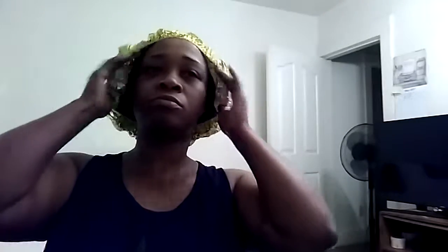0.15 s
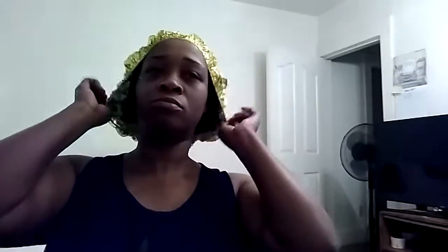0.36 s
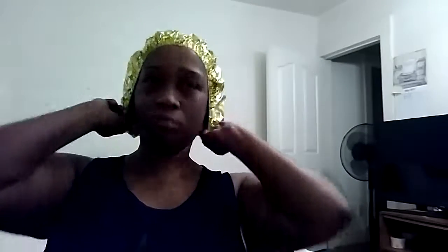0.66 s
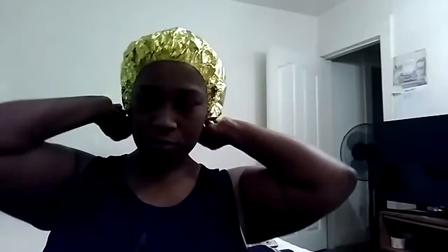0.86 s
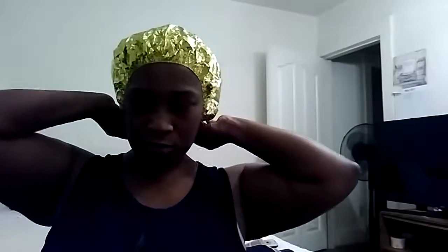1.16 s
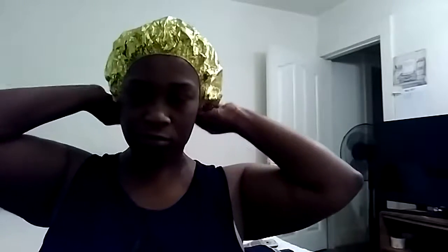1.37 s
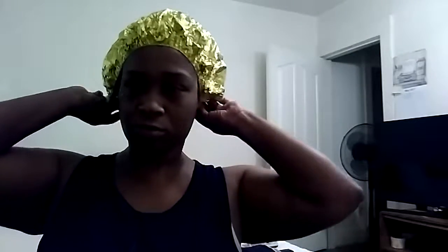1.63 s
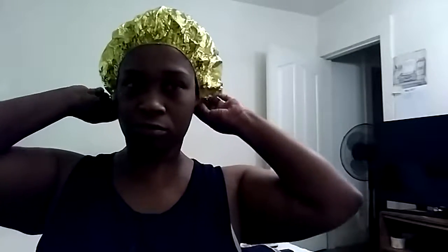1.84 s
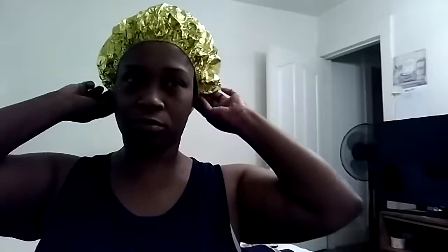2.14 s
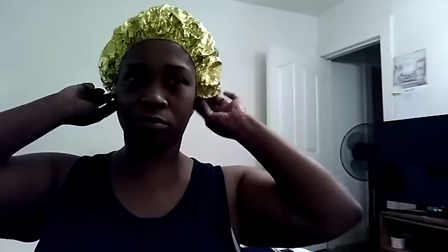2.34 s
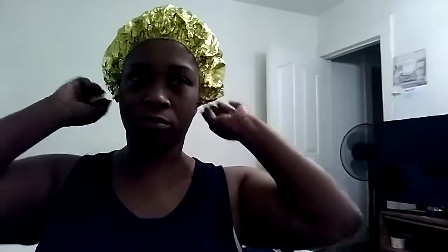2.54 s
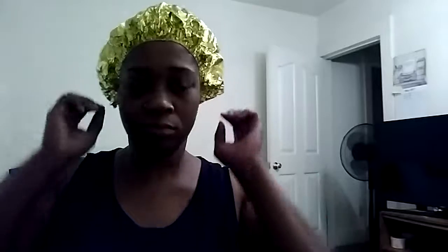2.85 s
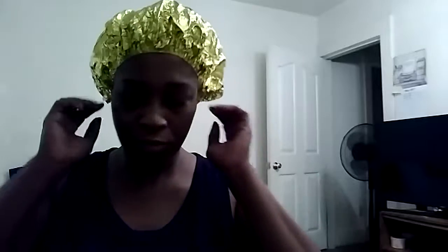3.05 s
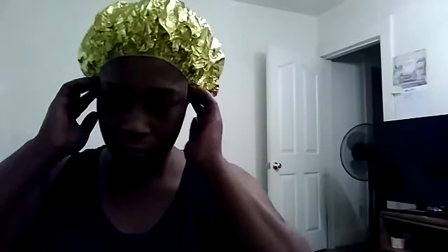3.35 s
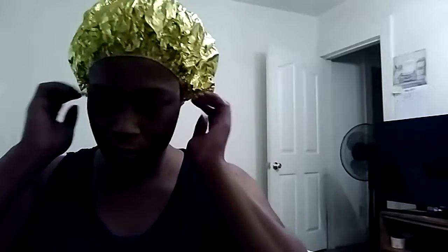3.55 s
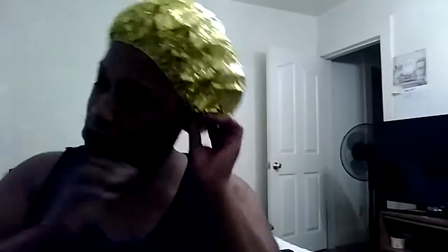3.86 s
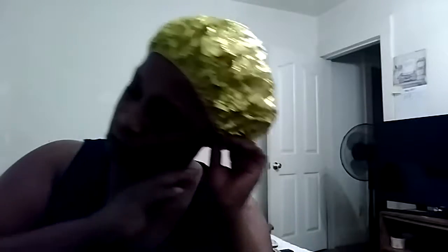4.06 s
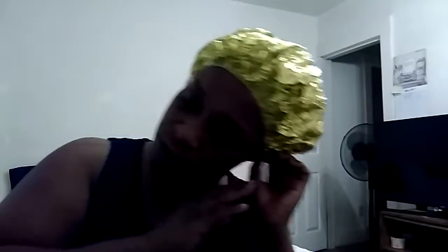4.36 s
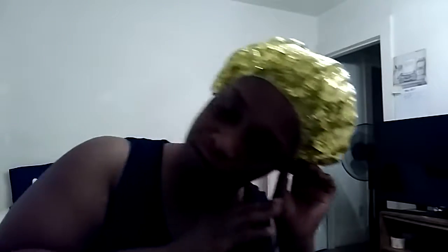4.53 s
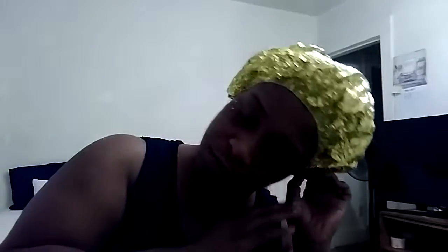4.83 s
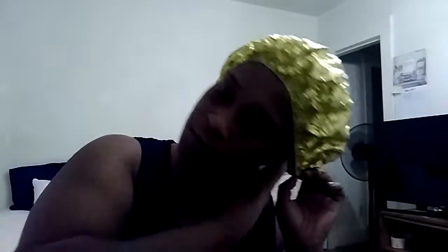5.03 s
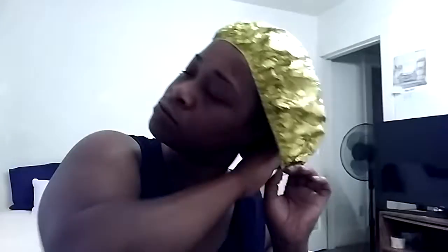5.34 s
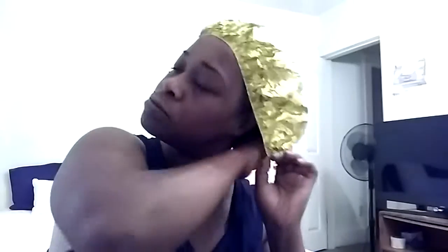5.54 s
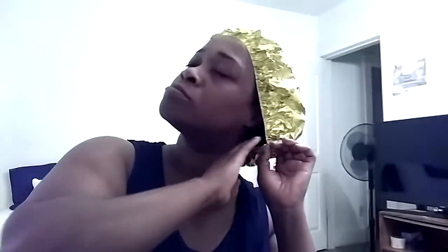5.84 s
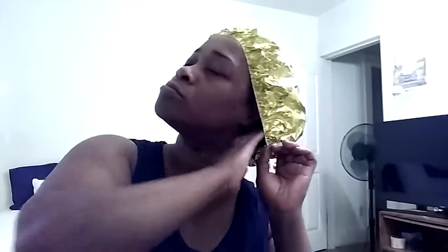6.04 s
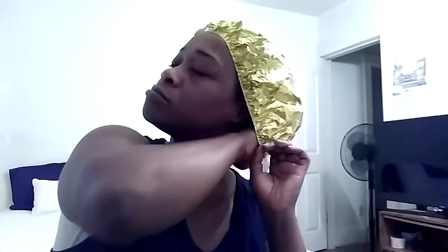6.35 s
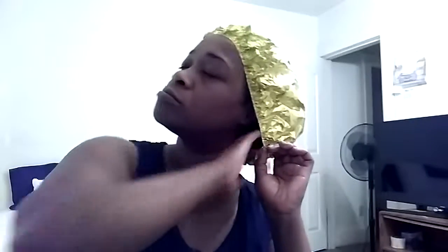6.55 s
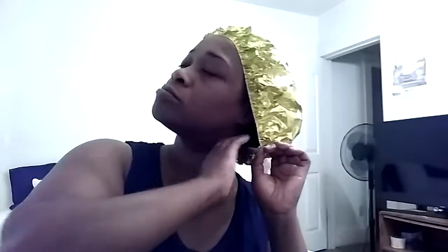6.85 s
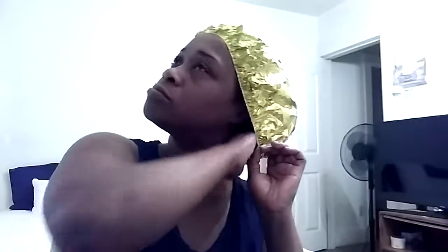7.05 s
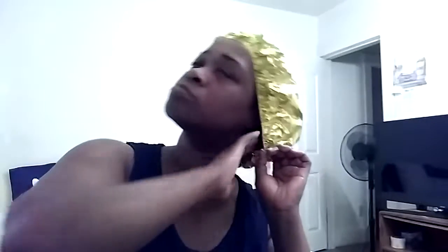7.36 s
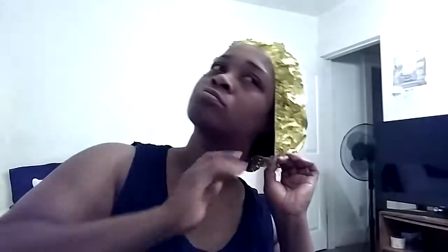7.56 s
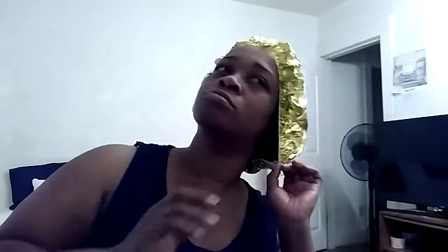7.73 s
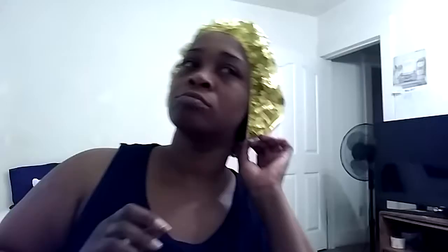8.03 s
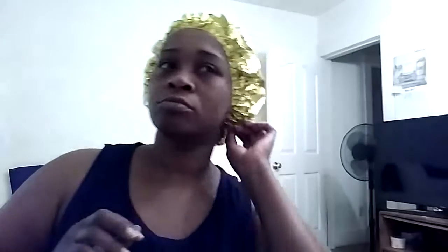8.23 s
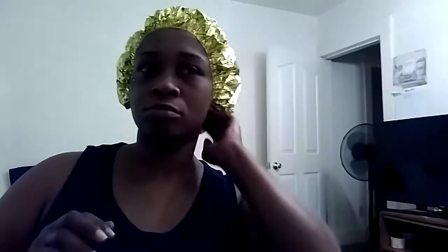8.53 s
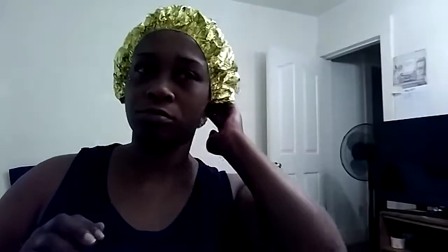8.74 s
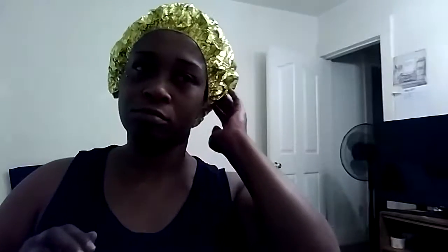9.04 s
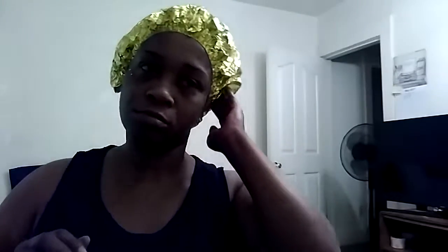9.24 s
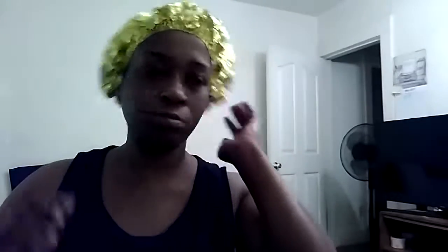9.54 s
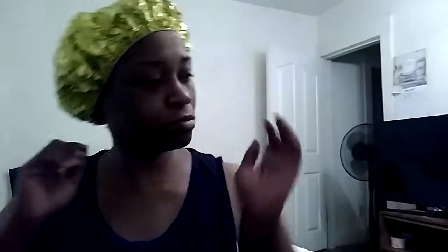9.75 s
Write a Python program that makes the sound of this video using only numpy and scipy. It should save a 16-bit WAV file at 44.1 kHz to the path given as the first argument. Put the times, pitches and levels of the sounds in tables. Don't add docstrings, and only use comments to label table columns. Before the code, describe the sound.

About a metre from a stereo microphone in a quiet bedroom, hands smooth a foil cap with dense crinkling, then sparser ticks as the rim is pinched. A sudden loud crackle comes past the middle, then light rustles while hair is tucked, and finally brisk patting crackles with one soft low thump. Faint rumble and hiss lie beneath.

```python
import sys
import numpy as np
from scipy import signal
from scipy.fft import rfft, irfft, next_fast_len
from scipy.io import wavfile
from scipy.ndimage import uniform_filter1d, map_coordinates

SR = 44100
rng = np.random.default_rng(int(sys.argv[2]) if len(sys.argv) > 2 else 0)


def pcm_store(signal):
    levels = np.round(np.clip(np.atleast_2d(signal), -1, 1) * 32767)
    wavfile.write(sys.argv[1], SR, levels.astype(np.int16).T)


def magnitude_from_level(level_db):
    exponent = np.asarray(level_db, float) / 20
    return 10 ** exponent


N = 436149

# pitch_hz [Hz], left_db [dB], right_db [dB]
SHARP = [(3170, -30.5, -38.5), (5530, -15, -19), (6370, -14, -21.5), (8840, -7, -20), (10680, -1, -57.5),
         (12470, 6.5, -73), (15380, -6.5, -62), (16850, -19, -28.5)]
# pitch_hz [Hz], left_db [dB], right_db [dB]
BODY = [(150, -6, -8.5), (554, -3, -8), (1150, 4.5, -5), (1860, 4.5, -5), (3480, 0, -2), (5020, -1, -10.5),
        (6100, -14.5, -0.5), (11700, -40, -61)]


def unit(x):
    return x / np.sqrt(np.mean(x ** 2) + 1e-20)


def along(points, hz):
    f, *columns = np.transpose(points)
    return np.array([np.interp(np.log(hz + 1), np.log(f + 1), column) for column in columns])


def wobble(rate):
    knots = rng.standard_normal(int(N * rate / SR) + 4)
    return map_coordinates(knots, [np.arange(N) * rate / SR])


def at_ports(pair, colour):
    # pitch_hz [Hz], likeness [0-1], phase [radians]
    port_match = [(40, .82, 3.2), (350, .75, 3.3), (500, .5, 3.9), (950, .5, 6.1), (1500, .45, 3.4),
                  (2500, .4, 2), (6000, .3, 0)]
    m = next_fast_len(N + 8192)
    hz = np.fft.rfftfreq(m, 1 / SR)
    left, other = rfft(pair, m)
    like, phase = along(port_match, hz)
    like = np.clip(like, 0, 1)
    right = like * np.exp(1j * phase) * left + np.sqrt(1 - like ** 2) * other
    gain = magnitude_from_level(along(colour, hz))
    gain /= np.sqrt(np.mean(gain.sum(axis=0) ** 2) / 4)
    return irfft(np.array([left, right]) * gain, m)[:, :N]


def bursts(seconds, size, life_s, ripple_db, colour):
    t = np.arange(512) / SR
    fade = np.exp(-t / life_s) + .13 * np.exp(-t / (3 * life_s))
    shape = (1 - np.exp(-t / .0003)) * fade
    noise = rng.standard_normal((len(seconds), 4, len(t)))
    ripple = unit(uniform_filter1d(noise[:, 2:3, :257], size=30, axis=2))
    ragged = magnitude_from_level(3.4 * unit(uniform_filter1d(noise[:, 3:], size=24, axis=2)))
    grain = irfft(rfft(noise[:, :2]) * magnitude_from_level(ripple_db * ripple)) * shape * ragged

    gain = magnitude_from_level(along(colour, np.fft.rfftfreq(len(t), 1 / SR)))
    gain = gain / np.linalg.norm(gain, axis=1, keepdims=True) * np.sqrt(len(t) / 2)
    heard = irfft(rfft(grain) * gain)
    grain *= 2 / np.abs(heard).max(axis=2, keepdims=True)

    starts = np.round(seconds * SR).astype(int)
    spots = (starts[:, None] + np.arange(len(t))).ravel()
    ports = []
    for c in (0, 1):
        sized = grain[:, c] * size[c][:, None]
        ports.append(np.bincount(spots, sized.ravel(), N + len(t))[:N])
    return np.array(ports)


def hands():
    # start_s [s], hold_s [s], crackle_db [dB], brushing_db [dB]
    strokes = [(0, 0.087, -45.5, -61), (0.17, 0.14, -41, -60.5), (0.312, 0.24, -38, -52.5),
               (0.573, 0.16, -34.5, -56), (0.777, 0.2, -34, -48), (0.99, 0.21, -44, -56),
               (1.279, 0.06, -46, -72), (1.377, 0.064, -37, -47.5), (1.495, .21, -41.5, -56),
               (1.772, 0.067, -48, -86), (1.873, 0.11, -46.5, -81), (2.057, 0.075, -42.5, -55.5),
               (2.167, 0.23, -49.5, -67), (2.484, 0.094, -49, -62), (2.592, 0.058, -53.5, -72),
               (2.781, 0.017, -61, -72), (3.004, .03, -60.5, -101), (3.3, 0.32, -56, -62),
               (3.865, 0.21, -40, -64), (4.157, 0.18, -52, -67), (4.393, 0.28, -60.5, -81),
               (4.813, 0.31, -56, -67), (5.12, 0.16, -65, -91), (5.26, 0.12, -58, -64),
               (5.396, 0.093, -41.5, -51), (5.468, 0.055, -33, -43.5), (5.646, 0.083, -54, -59),
               (5.75, 0.17, -49.5, -57.5), (6.085, .03, -63, -90), (6.19, 0.23, -58, -61),
               (6.379, 0.083, -44, -53), (6.529, 0.14, -49.5, -55.5), (6.81, .02, -57, -84),
               (7.056, 0.16, -54, -59.5), (7.356, 0.1, -55, -58), (7.503, 0.25, -64, -70.5),
               (7.734, 0.028, -44.5, -52.5), (7.817, 0.13, -39.5, -54.5), (7.99, 0.15, -62, -74),
               (8.19, 0.093, -53.5, -67), (8.327, 0.015, -36, -48), (8.656, 0.021, -55, -68),
               (8.71, 0.078, -37.5, -49.5), (8.864, 0.085, -40, -50.5), (8.998, 0.11, -35, -48.5),
               (9.198, 0.14, -46, -57), (9.39, 0.21, -56.5, -63), (9.556, 0.062, -36, -50.5),
               (9.748, 0.17, -57, -71)]
    grip_db_per_s, let_go_db_per_s = 603, 279
    start, hold, *levels = np.transpose(np.array(strokes))[:, :, None]
    t = np.arange(0, N / SR, .002)
    before_s = np.maximum(start - t, 0)
    after_s = np.maximum(t - start - hold, 0)
    loss_db = grip_db_per_s * before_s + let_go_db_per_s * after_s
    curves = []
    for db in levels:
        power = np.sum(magnitude_from_level(db - loss_db) ** 2, axis=0) + 1e-9
        curves.append(np.interp(np.arange(N) / SR, t, 10 * np.log10(power)))
    return curves


def crackle(level_db, per_s, spread_db, clump_db, smooth):
    spikes = (rng.random(N) < per_s / SR) * magnitude_from_level(spread_db * rng.exponential(size=N).clip(0, 3))
    fold = np.exp(-np.arange(SR // 200) / (.001 * SR))
    grain = signal.fftconvolve(spikes * magnitude_from_level(clump_db * wobble(30)), fold)[:N]
    grain /= np.sqrt(np.abs(uniform_filter1d(grain ** 2, size=SR // 8)) + 1e-9)
    share = np.clip(smooth, 0, 1)
    return magnitude_from_level(level_db) * np.sqrt(share + (1 - share) * grain ** 2) * rng.standard_normal((2, N))


def room_tone(brushing_db):
    # pitch_hz [Hz], left_db [dB], right_db [dB]
    rumble_colour = [(20, -29, -52), (39, -11.5, -6.5), (55, 4, 0), (96, -7.5, -4), (167, -8.5, -10),
                     (400, -23, -38.5), (1004, -78, -90.5)]
    cloth_colour = [(60, -40.5, -36), (166, -5, -3), (340, 2.5, 0.5), (558, -8.5, -6.5),
                    (1140, -16.5, -14.5), (3000, -63, -46.5), (8000, -91, -86.5)]
    hiss_colour = [(308, -16, -34), (1000, -15, -3), (2550, 0.5, 2.5), (5000, -1, -1.5), (7970, -2.5, -5),
                   (12600, 10.5, -27), (15600, -0.5, -15)]
    # pitch_hz [Hz], left_db [dB], right_db [dB]
    whine_tones = [(14000, -76, -76)]
    # time_s [s], strength_db [dB]
    arm_moves = [(0.0, -66), (0.33, -60), (0.82, -68.5), (1.57, -61.5), (1.73, -67), (3.19, -65.5),
                 (3.5, -64), (3.72, -70), (4.13, -70.5), (4.62, -70), (5.01, -66), (6.17, -68), (6.5, -69),
                 (6.99, -71), (7.33, -67), (8.32, -66.5), (8.51, -68.5), (9.89, -69)]

    gate_db, gate_depth_db, gate_soft_db, gate_s = -73, 8.5, 3.5, 0.02
    effort_db = uniform_filter1d(brushing_db, round(gate_s * SR))
    shut_db = -gate_depth_db / (1.5 + np.exp((effort_db - gate_db + 15) / gate_soft_db))

    arms_db = np.interp(np.arange(N) / SR, *np.transpose(arm_moves))
    arms_db -= arms_db.mean()
    rumble_db = -66.5 + shut_db + 0.49 * wobble(3) + .7 * arms_db
    follow_db = 0.23 * np.maximum(effort_db - gate_db, -9)
    cloth_db = -67.5 + follow_db + 0.53 * wobble(3) + 0.57 * arms_db

    rumble, cloth, hiss = (unit(at_ports(rng.standard_normal((2, N)), colour))
                           for colour in (rumble_colour, cloth_colour, hiss_colour))
    whine = np.zeros((2, N))
    for hz, left_db, right_db in whine_tones:
        tone = np.sin(2 * np.pi * hz * np.arange(N) / SR + .3 * wobble(30))
        whine += magnitude_from_level([[left_db], [right_db]]) * tone
    lows = magnitude_from_level(rumble_db + 9.5 + 3.3 * wobble(10)) * rumble
    lows += magnitude_from_level(cloth_db + 2.0 + 2.7 * wobble(11)) * cloth
    return lows + magnitude_from_level(-68 + .5 * shut_db) * hiss + whine


def snaps(crackle_db):
    # start_s [s], peak_db [dB], low_body_db [dB]
    creases = [(0.0712, -30, -27), (0.1196, -30, -34), (0.1476, -30, -30), (0.174, -23, -29),
               (0.3476, -24, -24), (0.5242, -24, -24), (0.5641, -21, -32), (0.5881, -22, -24),
               (0.629, -19, -26), (0.7028, -23, -25), (0.7312, -21, -29), (0.8026, -20, -28),
               (0.831, -20, -24), (1.0665, -27, -30), (1.27, -32, -34), (1.5788, -25, -31),
               (1.6282, -19, -37), (1.719, -24, -32), (1.7649, -27, -37), (1.7918, -25, -36),
               (1.8761, -26, -36), (1.8891, -22, -31), (1.9175, -23, -37), (1.943, -22, -38),
               (1.9739, -25, -35), (2.3191, -26, -37), (2.4723, -33, -32), (2.5207, -24, -34),
               (2.9791, -34, -41), (3.3039, -40, -18), (3.7948, -39, -33), (3.8462, -20, -29),
           (3.8826, -19, -30), (3.9275, -21, -33), (3.9809, -24, -29), (4.0153, -26, -29),
           (4.0327, -25, -29), (4.0507, -26, -27), (4.0931, -24, -33), (4.1165, -23, -32),
           (4.2293, -26, -29), (4.3176, -36, -32), (4.4044, -30, -39), (4.4877, -36, -20),
           (4.5101, -28, -23), (4.5326, -36, -22), (4.6219, -26, -40), (4.7082, -37, -38),
           (4.7386, -32, -43), (4.796, -27, -36), (4.8125, -22, -42), (4.8509, -25, -31),
           (4.9177, -20, -38), (4.9881, -29, -28), (5.0669, -30, -32), (5.1377, -24, -34),
           (5.1836, -21, -27), (5.219, -22, -31),
               (5.3727, -23, -17), (5.3911, -16, -28), (5.4301, -15, -28), (5.453, -15, -29),
            (5.4715, -8, -30), (5.4889, -11, -30), (5.5847, -24, -26), (5.8027, -29, -31),
            (5.8421, -34, -22), (6.0821, -25, -39), (6.3734, -27, -25), (6.4083, -32, -22),
            (6.5201, -32, -25), (6.544, -26, -27), (7.0115, -39, -19), (7.0559, -33, -20),
            (7.1312, -29, -23), (7.3417, -25, -34), (7.5133, -40, -25), (7.6844, -32, -28),
            (7.7333, -33, -15), (7.7697, -29, -22), (7.8017, -26, -22), (7.8241, -27, -19),
            (7.874, -22, -28), (7.9314, -23, -29), (8.0476, -30, -35), (8.1868, -36, -26),
            (8.2172, -26, -38),
               (8.326, -17, -23), (8.6383, -30, -32), (8.7026, -12, -39), (8.7395, -23, -24),
           (8.7655, -23, -20), (8.8348, -28, -28), (8.8623, -23, -29), (8.9002, -24, -22),
           (8.9201, -24, -25), (8.9895, -25, -26), (9.0443, -19, -29), (9.0718, -24, -23),
           (9.1496, -30, -27), (9.1656, -28, -25), (9.197, -32, -25), (9.2244, -23, -33),
           (9.2514, -25, -24), (9.3112, -22, -27), (9.3816, -35, -28), (9.4295, -25, -34),
           (9.5083, -27, -29), (9.5297, -21, -27), (9.5956, -18, -31),
               (0.3122, -27, -21), (0.4364, -24, -29), (0.4738, -23, -27), (0.9684, -25, -25),
             (1.0784, -32, -25), (1.1533, -32, -24), (1.2925, -33, -33), (1.3723, -25, -23),
             (2.0737, -29, -27), (2.0986, -27, -28), (2.2573, -35, -31), (2.2857, -35, -28),
             (2.9934, -37, -40), (3.4346, -39, -19), (3.4955, -41, -20), (4.4184, -36, -37),
             (4.7686, -40, -23), (5.009, -37, -27), (5.5124, -15, -26), (6.3834, -29, -23),
             (6.5999, -36, -20), (6.8144, -45, -26), (7.1013, -36, -19), (7.3926, -37, -17),
             (7.9124, -23, -29), (8.2334, -32, -32), (9.6084, -22, -28),
               (0.2374, -25, -34), (0.2454, -25, -31), (0.6504, -22, -23), (0.6664, -21, -27),
             (1.3344, -29, -24), (1.4765, -29, -19), (1.5259, -28, -28), (1.8134, -32, -30),
             (1.8934, -22, -34), (1.8984, -23, -30), (2.0443, -35, -20), (2.1685, -34, -25),
             (2.1904, -35, -27), (2.2254, -37, -28), (2.3745, -40, -21), (4.6334, -36, -30),
             (4.8184, -33, -28), (4.8848, -38, -20), (5.3048, -43, -22), (5.4014, -19, -24),
             (5.5174, -16, -26), (5.5374, -20, -24), (8.7134, -19, -29), (8.7464, -23, -20),
             (8.7804, -30, -23), (8.8712, -24, -22), (9.2674, -32, -17), (9.3254, -35, -14),
               (.4114, -26, -29), (.4564, -26, -27), (.6064, -23, -26), (4.7214, -41, -36), (4.8024, -31, -38),
            (5.3784, -23, -30), (5.4126, -20, -28), (5.4204, -19, -28), (5.4944, -18, -26),
            (7.3093, -38, -28), (7.3284, -39, -30), (8.301, -31, -26), (8.6964, -27, -33)]
    big = np.array(creases)

    luck = rng.random((int(45 * N / SR), 3))
    at = (luck[:, 0] * N).astype(int)
    small_db = crackle_db[at] + 11 - 7.5 * luck[:, 1]
    small_body_db = -22.5 + 12 * (luck[:, 2] - .5)
    small = np.transpose([at / SR, small_db, small_body_db])

    after = big + [.003, -8.5, 0] + rng.random((len(big), 3)) * [.014, -17, 0]

    start_s, db, body_db = np.vstack([big, after, small]).T
    db = db - 4
    duller_db = 0.76 * (body_db + 30)
    flap_db = db + body_db + 2.5
    tick = bursts(start_s, magnitude_from_level([db - 1.0, db + 4 + duller_db]), life_s=.0011, ripple_db=2.5, colour=SHARP)
    flap = bursts(start_s, magnitude_from_level([flap_db + 11.5, flap_db + 8.5]), life_s=.002, ripple_db=2.0, colour=BODY)
    return tick, magnitude_from_level(6) * np.diff(flap, prepend=0)


def taps():
    # start_s [s], peak_db [dB]
    touches = [
        (0.081, -64),
        (2.046, -50),
        (6.0437, -55),
        (6.2527, -74),
        (7.455, -57.5),
        (9.619, -53),
    ]
    start_s, db = np.transpose(touches)
    touch = bursts(start_s, magnitude_from_level([db + 18, db + 18]), life_s=0.001, ripple_db=3.5, colour=BODY)
    return np.diff(touch, prepend=0)


def walls(x, gap_s=.007):
    # pitch_hz [Hz], time to fall 60 dB [s]
    echo_life = [(200, 0.079), (2000, 0.38), (8000, 0.34), (14000, 0.12)]
    turn = np.arange(N) // (SR // 40) % 4
    wet = np.zeros_like(x)
    for k in range(4):
        hz, t, z = signal.stft(rng.standard_normal((2, SR // 2)), SR, nperseg=256)
        fade = magnitude_from_level(-60 * t / along(echo_life, hz).T)
        tail = signal.istft(z * fade, SR, nperseg=256)[1]
        tail = np.pad(tail / np.linalg.norm(tail[0]), ((0, 0), (round(gap_s * SR), 0)))
        wet += signal.fftconvolve(x * (turn == k), tail, axes=1)[:, :N]
    return wet


def thumps():
    # start_s [s], peak_db [dB]
    pushes = [
        (8.323, -46),
        (8.328, -36.5),
    ]
    # pitch_hz [Hz], width_hz [Hz], level_db [dB]
    ringing = [(121, 36, 1), (357, 63, 5.5), (840, 940, 1.5)]
    push = np.zeros(N)
    for s, db in pushes:
        push[round(s * SR)] = magnitude_from_level(db + 43.0)
    f = np.fft.rfftfreq(N, 1 / SR)
    ring = 0
    for k, (centre, width, db) in enumerate(ringing):
        resonance = 1j * f * width / (centre * centre - f * f + 1j * f * width)
        ring = ring + (-1) ** k * magnitude_from_level(db) * resonance
    soft = 1 / (1 + 1j * f / 450) ** 2
    return irfft(rfft(push) * ring * soft, N) * [[magnitude_from_level(8)], [-magnitude_from_level(-3.5)]]


def flickering_bands(x):
    # pitch_hz [Hz], share [0-1]
    shut_share = [(1500, 0), (2800, .15), (4500, .26), (7500, .18), (9500, .04), (13500, .04), (15500, .15)]
    top_hz = 15850
    hz, t, z = signal.stft(x, SR, nperseg=1024)
    luck = rng.random((len(hz) // 5 + 1, len(t) // 4 + 1))
    luck = luck.repeat(5, axis=0).repeat(4, axis=1)[:len(hz), :len(t)]
    gate = np.where(luck < along(shut_share, hz).T, magnitude_from_level(-30), 1)
    limit = np.where(hz < top_hz, 1, magnitude_from_level(-34.5))[:, None]
    return signal.istft(z * gate * limit, SR, nperseg=1024)[1][:, :N]


def scene():
    crackle_db, brushing_db = hands()
    tick, flap = snaps(crackle_db)
    foil = crackle(crackle_db - 2.5, per_s=1100, spread_db=2.5, clump_db=2.5, smooth=.15)
    hair = crackle(brushing_db - 2.5, per_s=600, spread_db=3, clump_db=3.5, smooth=.3)
    cap = at_ports(tick + foil, SHARP) + at_ports(flap + taps() + hair, BODY) + thumps()
    return cap + magnitude_from_level(-6.5) * walls(cap) + room_tone(brushing_db)


def top_cut(x):
    return signal.sosfilt(signal.butter(12, 16800, fs=SR, output="sos"), x)


def record(dry):
    return top_cut(flickering_bands(dry))


dry = scene()
out = record(dry)
pcm_store(out)
```